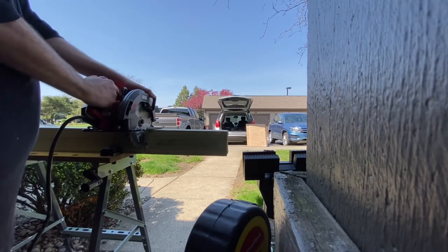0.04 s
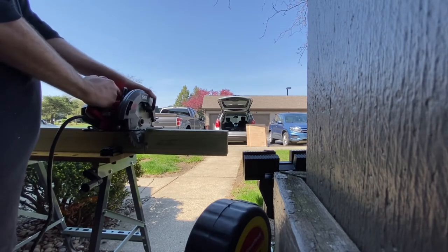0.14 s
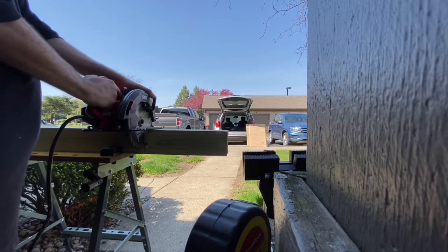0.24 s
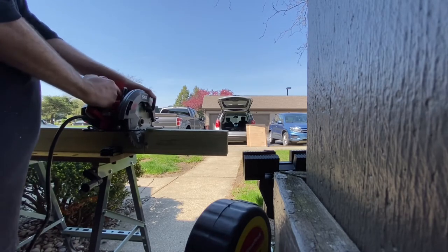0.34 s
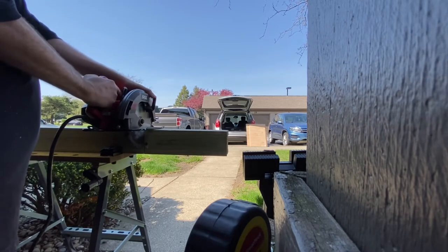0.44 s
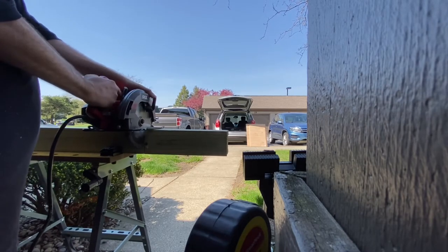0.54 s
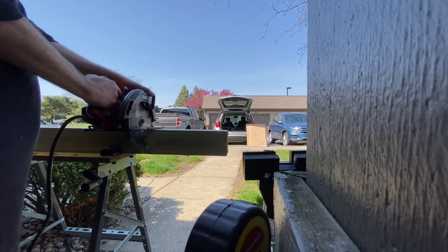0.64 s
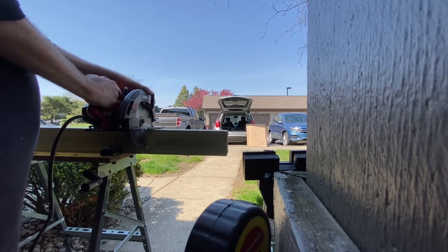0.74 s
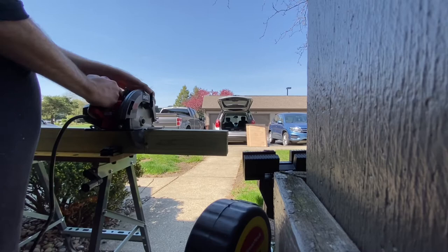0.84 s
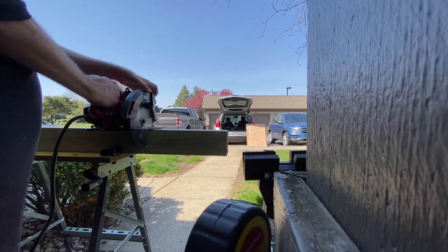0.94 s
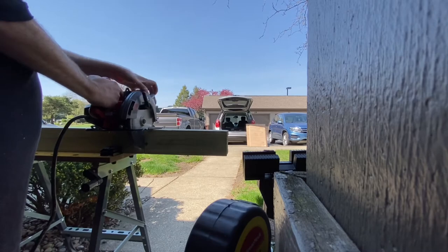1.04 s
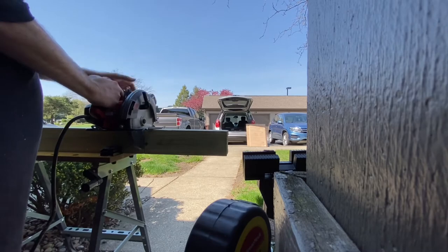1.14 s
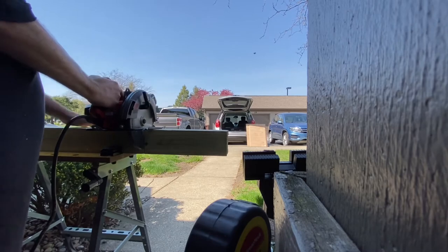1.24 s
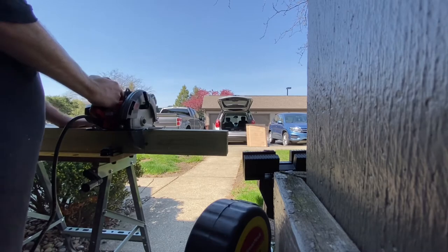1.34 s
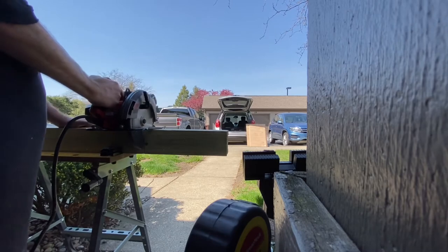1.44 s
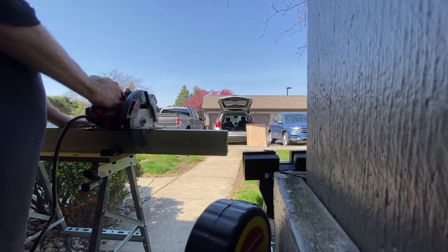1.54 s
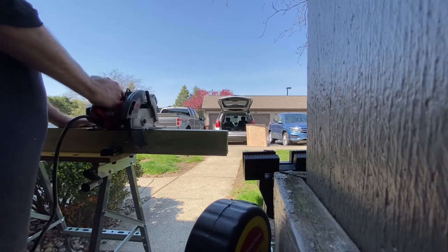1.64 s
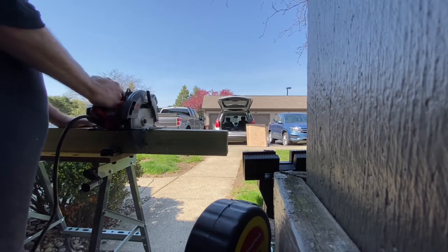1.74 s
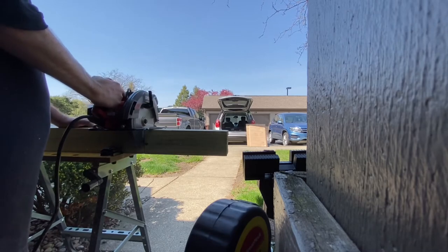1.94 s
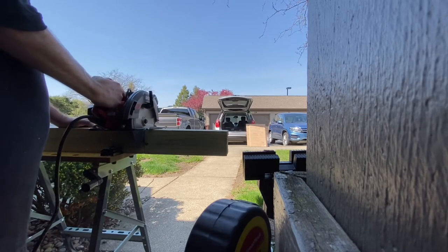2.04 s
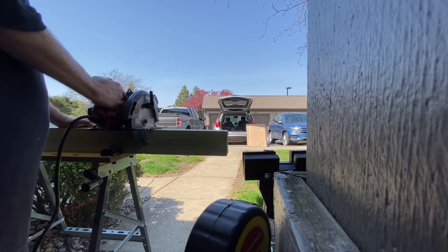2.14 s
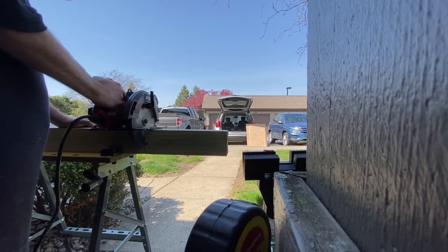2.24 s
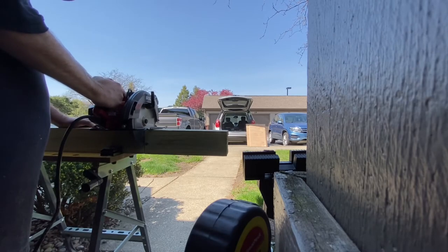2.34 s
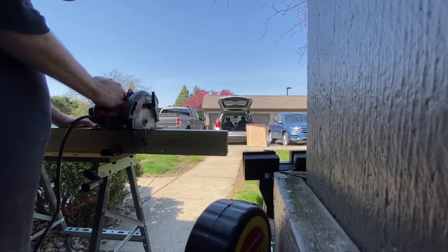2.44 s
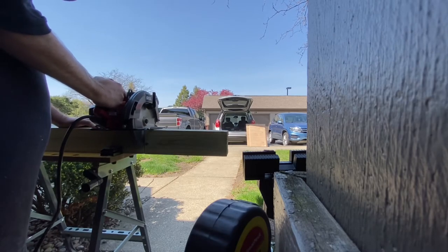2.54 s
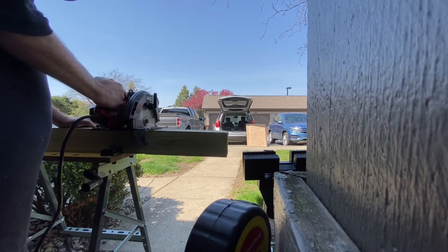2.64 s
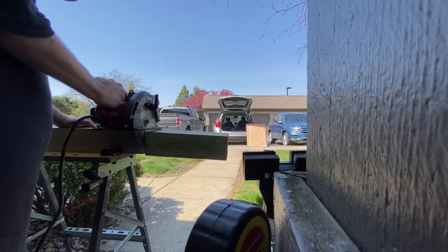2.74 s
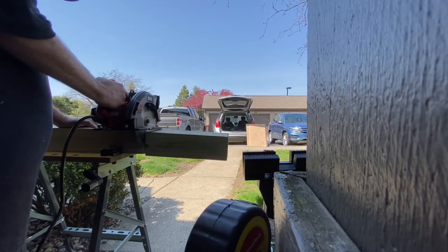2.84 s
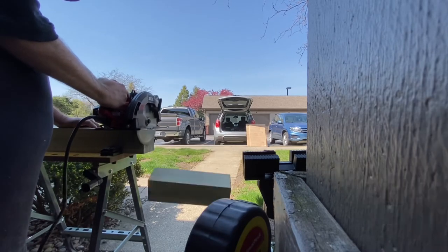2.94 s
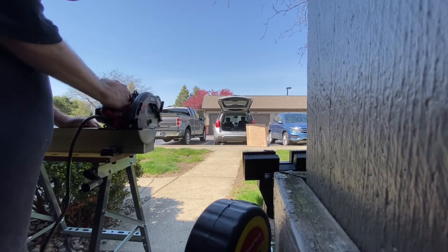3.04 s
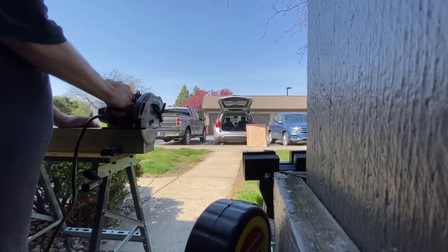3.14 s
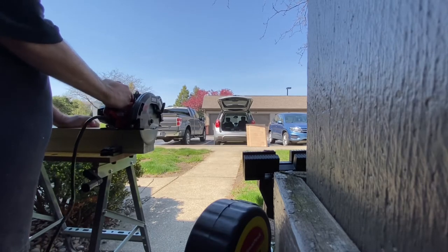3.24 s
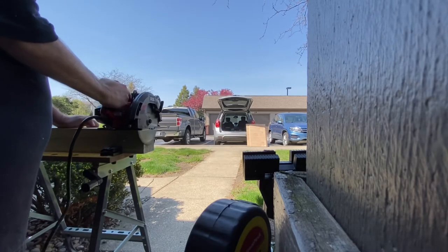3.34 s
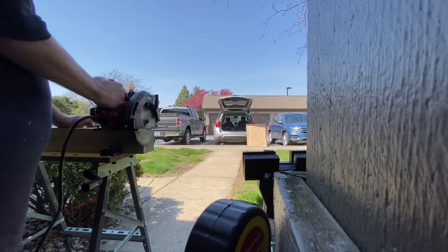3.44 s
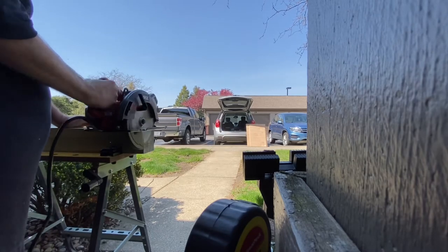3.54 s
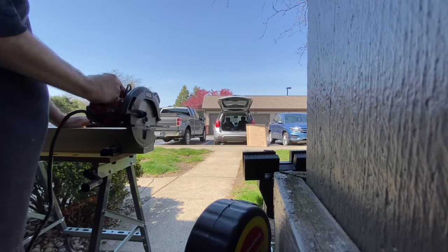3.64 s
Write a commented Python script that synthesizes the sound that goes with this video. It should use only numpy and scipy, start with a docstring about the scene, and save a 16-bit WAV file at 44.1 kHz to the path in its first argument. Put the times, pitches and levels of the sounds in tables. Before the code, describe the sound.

Circular saw starts with a harsh grind, bites through wood, then spins down with a falling whine

```python
"""Circular saw cutting a board

A corded circular saw starts with a clack outdoors, runs up, cuts through a board and coasts down.
Meshing gear teeth excite housing resonances; fan and blade give shaped noise; motor and cutting teeth
give tones locked to the rotation. The motor sags a little under load. A wooden knock, built of damped
modes, comes as the trigger is released; the blade then slows, chattering, over faint outdoor noise."""
import sys
import numpy as np
from scipy import signal
from scipy.fft import rfft, irfft
from scipy.io import wavfile

SR = 44100
rng = np.random.default_rng(int(sys.argv[2]) if len(sys.argv) > 2 else 0)


def store_wav(level_fs):
    """Save 16-bit WAV to argv[1]."""
    pcm = np.round(np.clip(np.atleast_2d(level_fs), -1, 1) * 32767)
    wavfile.write(sys.argv[1], SR, pcm.T.astype(np.int16))


N = 160965
T = np.arange(N) / SR  # time [s]
HZ = np.maximum(np.fft.rfftfreq(2 * N, 1 / SR), 1)  # frequency [Hz] of the zero-padded spectrum

START_S, RELEASE_S = .234, 2.96  # trigger pressed and let go
PINION_TEETH = 7
BLADE_ORDER = .35  # blade turns per motor turn
FADE_S = .052
MICROPHONE_LOW_CUT_HZ = 61

# spells in which the teeth bite the wood: (start [s], end [s], level of the tooth tones [dB])
BITES = [(1.036, 1.496, -34), (1.607, 2.64, -34.5)]
# rush of fan and blade: (time [s], level [dB])
RUSH_LEVEL = [(.234, -32), (.26, -27.5), (.3, -19.5), (.46, -23), (.72, -25.5), (1.15, -27), (1.42, -26),
              (1.62, -29.5), (2.4, -31), (2.62, -29), (2.95, -28.5), (3.1, -31.5), (3.28, -35),
              (3.38, -33.5), (3.54, -38.5)]


def from_db(db):
    """Logarithmic level: decibels become an amplitude gain."""
    return 10 ** (np.asarray(db) / 20)


def rms_one(x):
    """Power normalisation: the mean square becomes one."""
    return x / np.sqrt(np.mean(x ** 2) + 1e-20)


def in_time(rows):
    """Linear interpolation of (time, value) points."""
    return np.interp(T, *np.transpose(rows))


def gain_by_hz(points):
    """Frequency response: (frequency, level) points joined on a logarithmic frequency axis."""
    hz, db = np.transpose(points)
    return from_db(np.interp(np.log(HZ), np.log(hz), db))


def filtered(x, response):
    """Linear filtering: the spectrum is multiplied by a frequency response."""
    return irfft(rfft(x, 2 * N) * response)[..., :N]


def low_cut(x, hz):
    """Third-order high-pass filtering."""
    return signal.sosfilt(signal.butter(3, hz, "high", fs=SR, output="sos"), x)


def noise(colour):
    """Incoherent shaped noises of unit power for three paths: direct, scattered left, scattered right."""
    return rms_one(filtered(rng.standard_normal((3, N)), gain_by_hz(colour)))


def drift(rate_hz):
    """Random modulation: low-pass noise with a spread of one."""
    return rms_one(filtered(rng.standard_normal(N), 1 / (1 + (HZ / rate_hz) ** 2)))


def resonate(x, peaks):
    """Modal filtering: parallel two-pole resonances of alternating sign, at unit power."""
    out = 0
    for k, (hz, width, db) in enumerate(peaks):
        radius = np.exp(-np.pi * width / SR)
        poles = [1, -2 * radius * np.cos(2 * np.pi * hz / SR), radius * radius]
        gain = (-1) ** k * from_db(db) * (1 - radius * radius)
        out = out + gain * signal.lfilter([1, 0, -1], poles, x)
    return rms_one(out)


def strike(s, modes):
    """Impact excitation: one blow sets exponentially damped modes ringing."""
    age = np.maximum(T - s, 0)
    out = 0
    for k, (hz, db, t60) in enumerate(modes):
        decay = np.exp(-np.log(1000) * age / t60)
        out = out + (-1) ** k * from_db(db) * decay * np.sin(2 * np.pi * hz * age)
    return out


def held(start, end):
    """Trapezoidal envelope, at half height at its start and end times."""
    return np.clip(np.minimum(T - start, end - T) / FADE_S + .5, 0, 1)


def swell(s, width):
    """Gaussian envelope whose width is one standard deviation."""
    return np.exp(-.5 * ((T - s) / width) ** 2)


def outdoors(width, pan_db):
    """Partly coherent distant noise; its level falls after the saw starts and slowly creeps back."""
    # spectrum: (frequency [Hz], relative density [dB per Hz])
    colour = [(25, -46), (105, 0.5), (220, 0), (400, -12.5), (1200, -9.5), (1700, -23.5), (2600, -19.5),
              (3700, -27), (15000, -39)]
    # (time [s], level [dB])
    level = [(0, -40.5), (.29, -41), (.38, -57), (.8, -71.5), (3.65, -59.5)]
    three = noise(colour)
    sides = rms_one(three[0] + width * three[1:])
    return from_db(in_time(level)) * sides * from_db([[pan_db / 2], [-pan_db / 2]])


def starting_clack():
    """Impact at the start: two damped modes ring."""
    # modes: (frequency [Hz], level [dB], decay time to -60 dB [s])
    modes = [(2380, -30, .04), (5720, -19.5, 0.28)]
    return strike(START_S, modes)


def board(waver):
    """Sympathetic vibration: the board hums during the cut and its modes ring in a knock at the end."""
    # modes of the knock: (frequency [Hz], level before the low cut [dB], decay time to -60 dB [s])
    knock_modes = [(160, -40, 0.067), (455, -21.5, .025), (626, -22, 0.02), (895, -22.5, .016)]
    hum = np.sqrt(2) * np.sin(2 * np.pi * 129 * T) * (1 + waver * drift(7.2))
    knock = low_cut(strike(2.9403, knock_modes), MICROPHONE_LOW_CUT_HZ)
    return from_db(-59) * held(1.19, 2.62) * hum + knock


def rotor_turns(flutter):
    """Rotational dynamics: integrated speed, driven until the release, then slowed by drag and friction."""
    # motor speed under power, before flutter: (time [s], speed [turns per second])
    driven_speed = [(.234, 40), (.26, 150), (.29, 236), (.34, 325), (.42, 390), (.5, 422), (.58, 437),
                    (.74, 451), (.98, 470), (1.14, 483.6), (1.28, 486.2), (1.5, 482), (1.68, 465.8),
                    (2.3, 467.5), (2.66, 470.6), (2.82, 484.5), (2.96, 493)]
    drag_s, friction_hz_per_s = .765, 32
    run_up_flutter, settle_s = .009, .4
    coast = np.maximum(T - RELEASE_S, 0)
    speed = in_time(driven_speed) / (1 + coast / drag_s) - friction_hz_per_s * coast
    shudder = run_up_flutter * np.exp(-np.abs(T - START_S) / settle_s) * drift(200)
    return np.cumsum(speed * (1 + flutter * drift(40) + shudder)) / SR


def air(turns, throb, flicker_db):
    """Aerodynamic noise: a rush of fan and blade and a top hiss, amplitude-modulated once per turn."""
    # spectrum of the rush: (frequency [Hz], relative density [dB per Hz])
    rush_colour = [(50, -42), (130, -15.5), (300, -20), (500, -9), (900, -2), (2000, 2.5), (3000, 1),
                   (3800, 2.5), (4900, -1.5), (7900, 1), (10000, -3), (15500, -9)]
    # spectrum of the hiss: (frequency [Hz], relative density [dB per Hz])
    hiss_colour = [(3000, -36), (6000, -14), (8000, -3), (10300, 8.5), (12000, 5), (14000, 4), (15500, 5.5)]
    # top hiss: (time [s], level [dB])
    hiss_level = [(.234, -45), (.3, -29), (.42, -24.5), (.62, -24), (.8, -28.5), (1.15, -28.5), (1.3, -25),
                  (1.47, -25), (1.7, -31), (2.45, -29), (2.6, -28), (2.9, -29.5), (3.1, -36.5), (3.38, -45),
                  (3.55, -67)]
    rush = from_db(in_time(RUSH_LEVEL)) * noise(rush_colour)
    hiss = from_db(in_time(hiss_level)) * noise(hiss_colour)
    throbbing = 1 + throb * np.sin(2 * np.pi * turns)
    return (rush + hiss) * throbbing * from_db(flicker_db * drift(47))


def tone(turns, order, rough=.68):
    """Order tone: a sinusoid at a multiple of the rotation, randomly modulated in strength and phase."""
    phase = 2 * np.pi * order * turns + rough * drift(120)
    return np.sqrt(2) * np.sin(phase) * (1 + rough * drift(27))


def motor(turns):
    """Rotational harmonics: commutator whine, fan tone, low rotor and pinion orders, growl under load."""
    # commutator whine: (time [s], level [dB])
    whine_level = [(.234, -32), (.35, -29), (.58, -34.5), (.8, -36), (1.2, -40), (1.45, -33), (2.2, -43),
                   (2.95, -36.5), (3.15, -43), (3.38, -39), (3.52, -46)]
    # fan tone: (time [s], level [dB])
    fan_level = [(.3, -36.5), (.48, -31), (.62, -38), (.78, -47), (1.7, -43.5), (3.1, -45), (3.3, -61)]
    # low tone at twice the rotation: (time [s], level [dB])
    rotor_level = [(.3, -60), (.47, -43), (.85, -43), (1.3, -49.5), (2, -54.5), (3.1, -48.5), (3.35, -72)]
    # multiples of the rotation that sound with the rush: (order [tones per turn])
    rush_orders = [4, 7, 10]
    # their levels before the low cut: (level against the rush [dB])
    order_levels = [-20, -18, -18]
    commutator_bars, fan_blades, growl_order = 30, 14, 4

    halo = 1 + from_db(-5) * drift(220)  # sparking brushes smear the whine; the fan tone shares it
    whine = from_db(in_time(whine_level)) * tone(turns, commutator_bars, rough=.26) * halo
    fan = from_db(in_time(fan_level)) * tone(turns, fan_blades, rough=.64) * halo
    rotor = from_db(in_time(rotor_level)) * tone(turns, 2, rough=.25)
    orders = sum(from_db(db) * tone(turns, k) for k, db in zip(rush_orders, order_levels))
    # the small housing radiates little below 900 Hz
    radiated = low_cut(from_db(in_time(RUSH_LEVEL)) * orders, 900)
    load = sum(held(start, end) for start, end, _ in BITES)
    growl = from_db(-37) * load * tone(turns, growl_order, rough=.34)
    return whine + fan + rotor + growl + radiated


def teeth(turns, count=66):
    """Periodic cutting forces: an uneven comb of blade harmonics, with squeals as the blade sings in the kerf."""
    # squeals: (start [s], end [s], multiple of the blade's rotation, level [dB])
    squeal_spells = [(1.04, 1.17, 24, -38), (1.24, 1.55, 48, -36.5), (1.6, 1.85, 32, -40),
                     (2.47, 2.86, 28, -43)]
    spread_db = 7
    comb = 0
    for k, (size, phase) in enumerate(rng.uniform(-1.29, 1, (count, 2)), 1):
        harmonic = np.sin(2 * np.pi * (k * BLADE_ORDER * turns + phase))
        comb = comb + from_db(spread_db * size) * harmonic
    cutting = sum(from_db(db) * held(start, end) for start, end, db in BITES)
    squeals = 0
    for start, end, k, db in squeal_spells:
        squeals = squeals + from_db(db) * held(start, end) * tone(turns, k * BLADE_ORDER)
    return squeals + rms_one(low_cut(comb, 1400)) * cutting


def tooth_clicks(turns, uneven_db=0):
    """Impulsive gear meshing: one click of random strength per pinion tooth, independent on three paths."""
    meshing = np.diff(np.floor(turns * PINION_TEETH), prepend=0)
    return meshing * rng.standard_normal((3, N)) * from_db(uneven_db * drift(120))


def rasp(turns):
    """Backlash: without drive the gear teeth mesh loosely, in coarse uneven clicks that ring."""
    # resonances: (frequency [Hz], width [Hz], relative level [dB])
    rings = [(4430, 490, 5), (6440, 1400, 0)]
    coast = np.maximum(T - RELEASE_S, 0)
    level = from_db(-41.5 + 5.5 * coast) * np.minimum(coast / FADE_S, 1)  # rises 5.5 dB per second
    return level * resonate(tooth_clicks(turns, uneven_db=2.5), rings)


def gears(turns):
    """Forced resonance: meshing teeth ring the housing, grind under starting torque and chatter in bursts."""
    # steady rattle: (time [s], level [dB])
    rattle_level = [(.234, -32), (.255, -23), (.27, -16), (.35, -23), (.48, -24.5), (.75, -29), (1.05, -30),
                    (1.38, -27), (1.6, -32.5), (2.58, -32), (2.95, -36), (3.18, -38.5), (3.65, -35.5)]
    # resonances of housing, guard and blade: (frequency [Hz], width [Hz], relative level [dB])
    housing = [(1241, 69, 3), (1800, 85, 1.5), (1934, 49, -3.5), (2278, 47, 0), (2471, 24, 4.5),
               (2690, 86, 0), (3060, 134, -1), (3484, 28, 3), (3980, 95, -2), (4910, 114, -4),
               (5230, 32, -3), (6620, 620, -7.5)]
    # grinding resonances: (frequency [Hz], width [Hz], relative level [dB])
    grind_rings = [(2314, 190, 6), (3130, 300, 7.5), (4170, 180, 5.5), (4780, 81, 8.5)]
    # bursts of chatter: (centre [s], standard deviation [s], peak level [dB])
    chatters = [(0.279, 0.015, -18.5), (0.348, .008, -18), (2.57, .035, -33), (3.155, 0.018, -33.5),
                (3.375, 0.026, -35), (3.548, 0.0079, -39)]
    # chatter resonances: (frequency [Hz], width [Hz], relative level [dB])
    chatter_rings = [(2440, 160, 9), (3370, 100, -5)]

    rattle = from_db(in_time(rattle_level)) * resonate(tooth_clicks(turns), housing)
    clicks = tooth_clicks(turns)
    grind = from_db(-20) * swell(.3, .16) * resonate(clicks, grind_rings)
    bursts = sum(from_db(db) * swell(s, width) for s, width, db in chatters)
    return rattle + grind + bursts * resonate(clicks, chatter_rings)


def paths(x, left_s, right_s, echo_db):
    """Reflection: the direct sound and a delayed, weaker copy for each side's scattered path."""
    echoes = [from_db(echo_db) * np.interp(T - lag, T, x, left=0) for lag in (left_s, right_s)]
    return np.array([x] + echoes)


def place(three):
    """Interaural-type cues: direct sound leads on the left; scatter from wall and paving fills both sides."""
    # scattered against direct sound: (frequency [Hz], level ratio [dB])
    scatter_ratio = [(800, -7), (2400, 5), (4200, -5), (7000, 4), (11000, 3.5), (13000, -28)]
    # phase by which the left microphone leads: (frequency [Hz], phase [rad])
    phase_lead = [(100, 0.37), (500, 1.12), (1500, 3.1), (2000, 3.37), (2600, 4.9), (3300, 2.18),
                  (5400, 6.18), (11000, 13.7), (13000, 13.68)]
    # left minus right, for direct and scattered sound alike: (frequency [Hz], level difference [dB])
    balance = [(100, -3), (600, 0), (1150, 5), (1800, 5), (2050, 4.5), (3050, 6), (3900, -2), (10500, 2)]

    scatter = gain_by_hz(scatter_ratio)
    hz, radians = np.transpose(phase_lead)
    right_lag = np.interp(HZ, hz, radians) * np.array([[0], [1]])
    # the root shares the power between direct and scattered sound
    gain = gain_by_hz(balance) ** np.array([[.5], [-.5]]) / np.sqrt(1 + scatter ** 2)
    direct = filtered(three[0], gain * np.exp(-1j * right_lag))
    return direct + filtered(three[1:], gain * scatter)


def scene():
    """Superposition: saw and board in front of the outdoor noise."""
    background = outdoors(width=.45, pan_db=-5)
    turns = rotor_turns(flutter=.0012)
    running = T >= START_S
    noisy = running * (air(turns, throb=.042, flicker_db=.54) + rasp(turns) + gears(turns))
    tonal = running * (motor(turns) + teeth(turns)) + starting_clack() + board(waver=.14)
    saw = noisy + paths(tonal, left_s=.0041, right_s=.0029, echo_db=-2.5)
    return place(saw) + background


def record(dry):
    """Band limiting: the microphone drops the deep bass, and the top is cut steeply at 15750 Hz."""
    return filtered(low_cut(dry, MICROPHONE_LOW_CUT_HZ), 1 / (1 + (HZ / 15750) ** 200))


dry = scene()
out = record(dry)
store_wav(out)
```